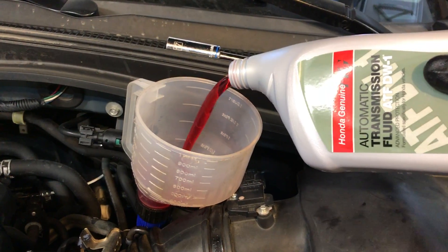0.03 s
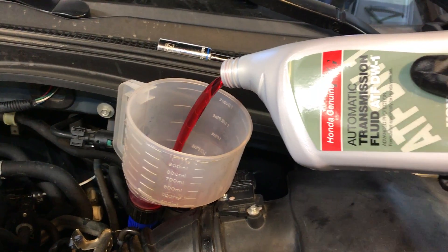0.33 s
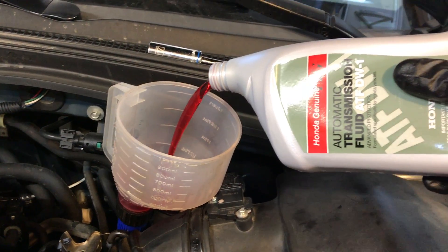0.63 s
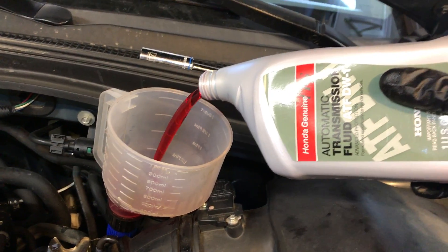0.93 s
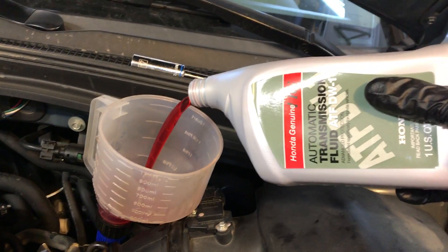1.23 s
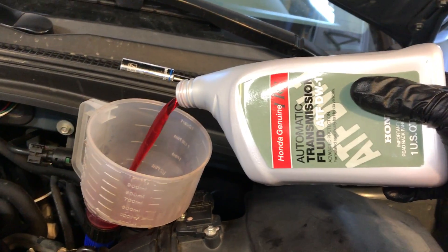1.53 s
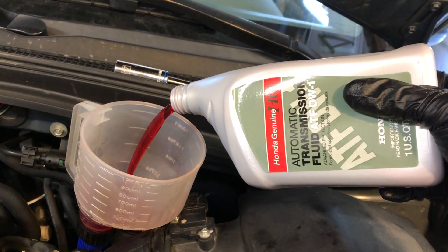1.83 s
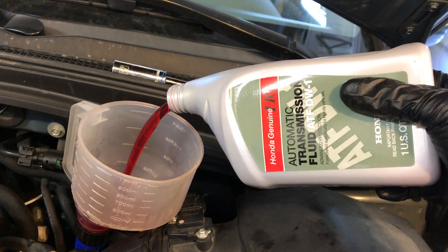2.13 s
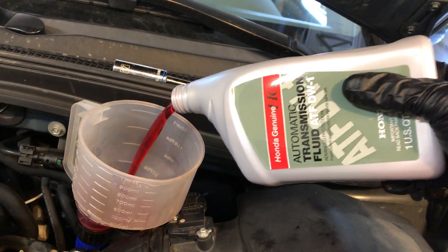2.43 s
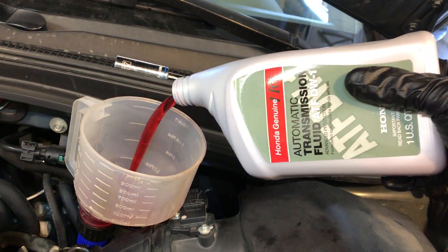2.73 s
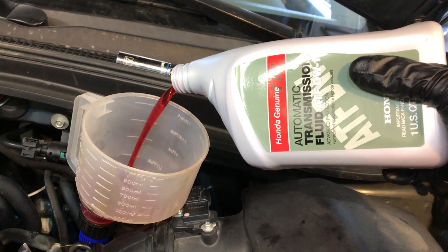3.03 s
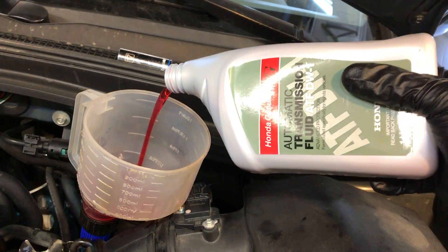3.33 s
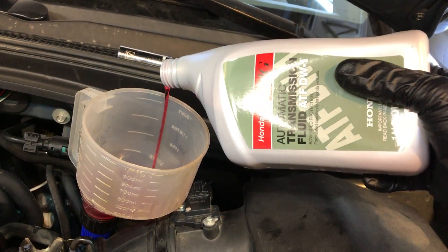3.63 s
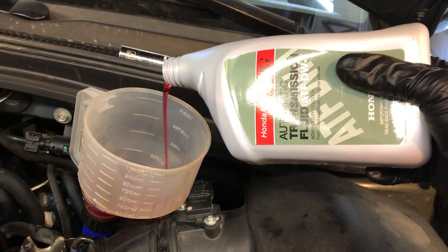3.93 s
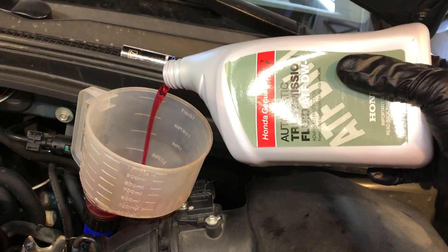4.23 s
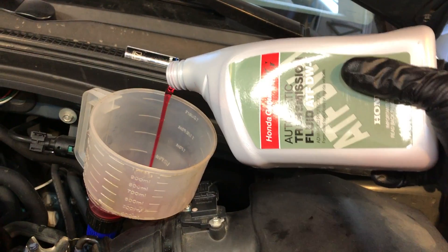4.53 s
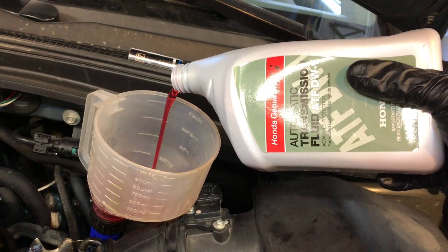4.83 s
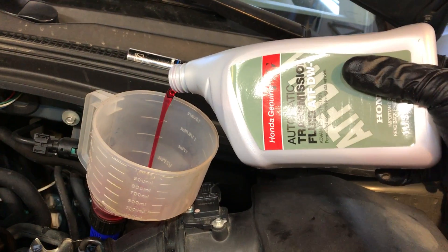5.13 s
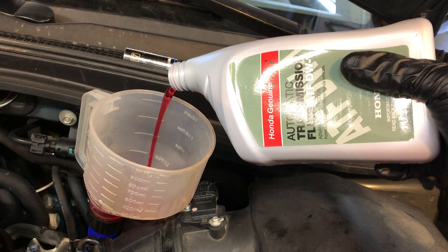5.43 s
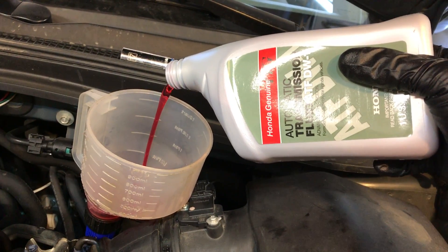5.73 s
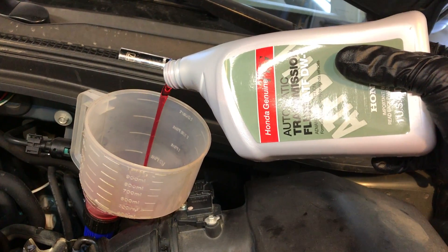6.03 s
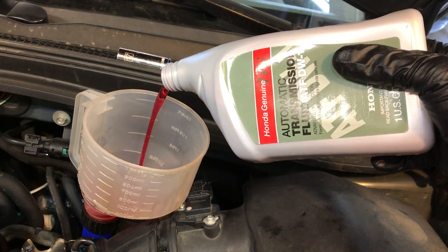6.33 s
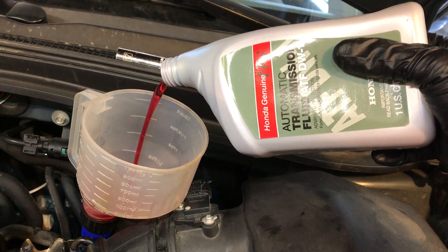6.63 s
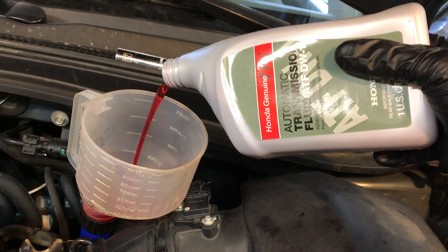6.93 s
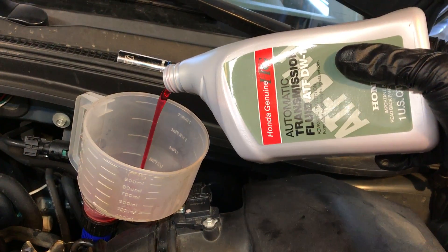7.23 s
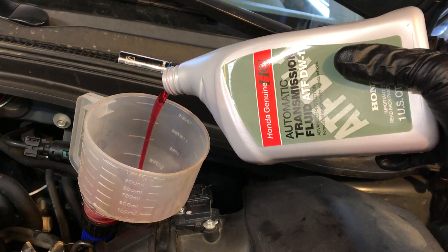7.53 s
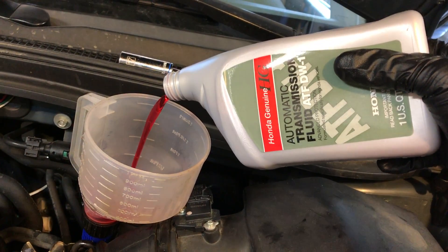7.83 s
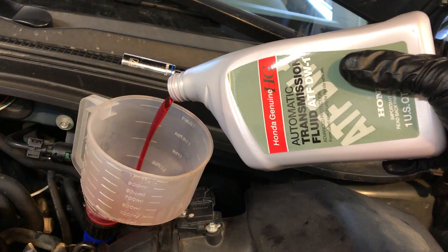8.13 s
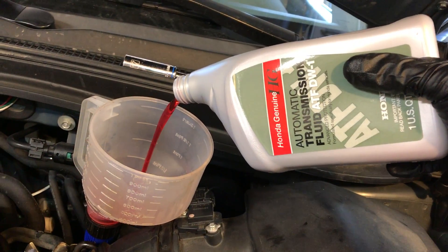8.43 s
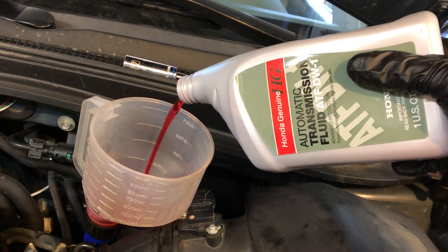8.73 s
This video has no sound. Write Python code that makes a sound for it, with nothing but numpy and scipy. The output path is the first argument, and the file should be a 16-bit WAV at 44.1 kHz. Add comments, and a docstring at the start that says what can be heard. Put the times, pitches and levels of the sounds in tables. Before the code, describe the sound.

Trapped air burps through oily fluid in a plastic funnel, with a glug and rapid bubble pops, after a quiet stretch of faint ticks.

```python
"""Trapped air burps up through a plastic funnel as transmission fluid drains into an engine.
The oily film flaps and snaps, ringing the air in the neck: a glug and a rough flutter first, then a
string of bubble pops that slows, doubles up and thins out. Hard pops throw a sparkle of spray.
The pour itself is silent. Before the burp, something scuffs once and the bottle ticks in the hand.
The quiet garage answers briefly, and traffic rumbles far away."""
import sys
import numpy as np
from scipy import signal
from scipy.fft import rfft, irfft, next_fast_len
from scipy.io import wavfile
from scipy.ndimage import map_coordinates

SR = 44100
rng = np.random.default_rng(int(sys.argv[2]) if len(sys.argv) > 2 else 0)


def store_pcm(level_fs):
    """Save levels as 16-bit WAV."""
    pcm = np.round(np.clip(level_fs, -1, 1) * 32767).astype(np.int16)
    wavfile.write(sys.argv[1], SR, np.atleast_2d(pcm).T)


N = 387638

# air gushing through the neck: (time [s], relative flow [dB])
AIR_FLOW = [(6.975, -35.5), (6.987, -29), (7.027, -33), (7.037, -26), (7.063, -36), (7.115, -30),
            (7.149, -37), (7.289, -48), (7.312, -60)]
# air modes of neck and fill tube: (pitch [Hz], width [Hz], gain in the gush [dB], gain in the pops [dB])
NECK_MODES = [(239, 89, -7, -8.5), (373, 71, -10, -23), (512, 53, -20, -46.5), (601.7, 39.5, 7.5, -7.5),
              (800, 180, -1.5, -37), (1001, 50.5, 3.5, 1), (1070, 49, -10, -25), (1153, 116, -4.5, -9),
              (1460, 161, -3, -1.5), (1595, 105, -0.5, -14), (1840, 87, -16, -19), (2150, 150, -5, -10.5),
              (2374, 110, -5.5, -11.5), (3140, 170, -7, -8)]
# softness of the oily film's snap: (frequency [Hz], gain [dB])
FILM_EQ = [(60, -30), (250, -4.5), (600, 1.5), (1600, 2), (2450, -7.5), (3000, -17.5), (4000, -33.5),
           (5400, -48), (7500, -33), (16000, -47)]
# each flap's low puff of air: (frequency [Hz], gain [dB])
PUFF_EQ = [(40, -8.5), (110, -1.5), (240, 7.5), (370, 2.5), (480, -2.5), (900, -77), (3000, -123)]
# big bubbles bursting in the open neck: (time [s], peak [dB])
BURSTS = [(6.806, -42), (6.9768, -21), (6.9893, -10), (7.0354, -12), (7.055, -17), (7.113, -33),
          (7.1275, -19.5), (7.2103, -20), (7.2298, -26.5), (7.2797, -31)]
# what a slack bubble rings: (pitch [Hz], width [Hz], gain [dB])
SLACK_MODES = [(615, 16, -18), (850, 27, -3.5), (1011, 25, 6.5)]
# bright crack of a tearing film: (frequency [Hz], gain [dB])
TEAR_EQ = [(300, -68), (1800, -8), (2700, 2.5), (3500, -7.5), (4100, -34), (8000, -36.5)]
# ring of the spout: (pitch [Hz], width [Hz], gain [dB])
SPOUT_MODES = [(4480, 130, -14.5), (5450, 170, -3.5)]
# sparkle of fine spray: (centre [Hz], width [Hz], gain [dB])
SPRAY_BANDS = [(9530, 600, -3.5), (12270, 1000, -1), (15500, 1300, -9)]
# plastic ticks and oil spatter: (time [s], peak [dB], ring pitch [Hz], ring over the snap [dB])
TICKS = [(0.47, -52.5, 4200, 9), (1.033, -44.5, 2980, 5), (1.184, -51, 4060, 6), (1.565, -54, 4670, 12),
         (2.0991, -54.5, 3030, 17), (2.6487, -49, 5040, 8), (2.702, -51.5, 4370, 5),
         (3.124, -53.5, 1130, 10), (3.135, -54.5, 1300, 6), (3.16, -53.5, 3960, 8), (6.9886, -45, 5640, 9),
         (7.014, -57, 6800, 12), (7.035, -50, 9050, 9), (7.054, -43, 2600, 16), (7.069, -48, 3000, 16),
         (7.202, -49, 9000, 6), (7.2302, -43, 5400, 9)]
# tone shared by all ticks: (frequency [Hz], gain [dB])
TICK_EQ = [(300, -1), (1200, -8), (3000, -4), (6500, -1.5), (10000, -8.5), (16000, -1)]
# dry hiss of the scuff: (frequency [Hz], gain [dB])
SCUFF_EQ = [(200, -18), (320, 7.5), (430, -22), (600, 1), (700, -15), (820, -6), (1100, -19), (1800, -18),
            (2800, -13.5), (4100, -8.5), (6000, -20.5), (8800, -8), (11000, -16), (16000, -20)]
# reverb tail of the garage: (frequency [Hz], time to fall 60 dB [s])
GARAGE_DECAY = [(200, 0.6), (1500, 0.31), (10000, 0.05)]
# far cars passing: (time when nearest [s], tyre level [dB], swell time [s])
CARS = [(3.3, -72.5, 0.66), (8.2, -60, 2.22)]
# tyre wash of the far road: (frequency [Hz], gain [dB])
TYRE_EQ = [(40, -13), (80, 6), (122, 20.5), (180, 10.5), (260, 7.5), (450, -4.5), (900, 2.5), (1500, -3.5),
           (2200, -15.5), (5000, -38), (16000, -66)]
# drone of a passing car: (frequency [Hz], gain [dB])
DRONE_EQ = [(45, -28), (85, 1.5), (125, 2), (160, -16.5), (240, -10), (300, -20.5), (380, -12), (500, -35),
            (2000, -82)]
# rumble of far engines: (frequency [Hz], gain [dB])
RUMBLE_EQ = [(20, -39), (35, -22.5), (46, -4), (55, 1.5), (64, -6.5), (78, 5.5), (90, -4.5), (120, -4.5),
             (150, -16.5), (210, -15), (300, -30), (600, -48), (2000, -101)]
# tones in that rumble: (pitch [Hz], level [dB])
HUM_TONES = [(55, -63.5), (73, -66.5), (122, -75.5)]
# room tone of still air: (frequency [Hz], gain [dB])
ROOM_TONE_EQ = [(100, 6.5), (300, 6), (600, -1.5), (1200, -8), (2500, -8.5), (4200, -9.5), (4900, -13),
                (6000, -10.5), (7700, -14.5), (8600, -11.5), (10500, -16.5), (11500, -13), (13000, -10.5),
                (17000, -13.5)]

GUSH_ATTACK_S, GUSH_RELEASE_S = 0.0019, 0.012  # the air breaks through; the oil closes over it again
FLAP_HZ, FLAP_OCTAVES_PER_DB = 141, 0.0115  # flap rate at full flow; it slows as the flow weakens
TURBULENCE_DB, CALMING_DB_PER_S = 2.5, 51  # ragged at first, settling into a regular flutter
PUFF_DB, PUFF_OPEN_S, PUFF_FOLLOWS = -42, 0.17, 0.3  # gain, time for the neck to open, dB per dB of flow
STRING_START_S, FIRST_GAP_S, GAP_GROWTH = 7.3267, 0.01897, 0.0986  # gap k = first gap * k ** growth
DOUBLED_S, BETWEEN_DB_PER_S = 7.77, 100  # when the in-between pops reach full size; how fast they grow
POP_DB, POP_FADE_DB_PER_S = -15, 28.5  # pop gain, fading as the trapped air runs out
POP_ATTACK_S, POP_RELEASE_S = 0.048, 0.075  # fade-in and fade-out of the whole string
THIN_HZ, THIN_HZ_PER_S = 200, 1080  # a rising low cut: shrinking bubbles lose their bass


def gush(gain_db=3, follows=0.85, jitter_s=0.00057, scatter_db=2.5, swirl=0.92, waver_octaves=0.0251):
    """Oil flaps in the escaping air, faster in strong flow; the flutter starts rough and grows regular."""
    times, levels = np.transpose(AIR_FLOW)
    t = np.arange(N) / SR
    flow_db = np.interp(t, times, levels)
    drop_db = flow_db - flow_db.max()
    flowing = (t >= times[0]) & (t < times[-1])
    age = np.maximum(t - times[0], 0)
    opening = np.clip(np.minimum(age / GUSH_ATTACK_S, (times[-1] - t) / GUSH_RELEASE_S), 0, 1)
    turbulence = amp(TURBULENCE_DB - CALMING_DB_PER_S * age)
    rate = FLAP_HZ * 2 ** (FLAP_OCTAVES_PER_DB * drop_db + waver_octaves * wobble(35))
    cycles = np.cumsum(rate * flowing) / SR
    at = np.flatnonzero(np.diff(np.ceil(cycles)) > 0)  # one flap as each cycle begins
    late, size = rng.standard_normal((len(at), 2)).T
    strength = opening[at] * amp(scatter_db * size) * np.sqrt(SR / rate[at])
    flaps = impulses(at + late * jitter_s * SR * turbulence[at], strength)
    # the air swirls most just after each flap
    eddies = opening * rng.standard_normal(N) * (1 + swirl * np.cos(2 * np.pi * cycles - 1))
    level = amp(gain_db + flow_db.max() + follows * drop_db)
    drive = level * (flaps + turbulence * eddies) / np.sqrt(1 + turbulence ** 2)
    flutter = through(drive, neck_ring([(hz, w, db) for hz, w, db, _ in NECK_MODES], soft_hz=2000))
    push = amp(PUFF_DB + PUFF_FOLLOWS * drop_db) * np.minimum(age / PUFF_OPEN_S, 1) ** 2
    puffs = through(flaps * push, impulse_response(lambda hz: amp(along(PUFF_EQ, hz))))
    return slackening_film(flutter, age) + puffs


def slackening_film(flutter, age, taut_hz=750, slack_hz=950, slacken_s=0.015, darken_db_per_s=25):
    """A taut film passes only the high modes; as it slackens, the low modes take over."""
    thin = butter(flutter, 3, taut_hz, "high")
    mellow = filtered(flutter, lambda hz: 1 / np.hypot(1, (hz / slack_hz) ** 4))
    brightness = 0.69 * amp(-darken_db_per_s * age)
    slack = brightness * flutter + (1 - brightness) * mellow
    taut = np.exp(-age / slacken_s)
    return taut * thin + (1 - taut) * slack


def glug(start_s=6.995, full_s=7.043, peak_db=-22, note_hz=598, sag_hz=70, sag_s=0.019, t60=0.12):
    """One big bubble swells in the neck: its ring sinks onto the neck's note, then dies."""
    age = np.maximum(np.arange(N) / SR - start_s, 0)
    swell = np.minimum(age / (full_s - start_s), 1) ** 2
    decay = amp(-60 * np.maximum(age + start_s - full_s, 0) / t60)
    pitch = note_hz + sag_hz * np.exp(-age / sag_s)
    return amp(peak_db) * swell * decay * np.sin(2 * np.pi * np.cumsum(pitch) / SR)


def bursts(low_cut_hz=950):
    """Single large bubbles crack in the wide open neck, with little bass."""
    times, peak_db = np.transpose(BURSTS)
    ring = neck_ring([(hz, w, db) for hz, w, db, _ in NECK_MODES], soft_hz=2300)
    crack = peak_one(butter(ring, 1, low_cut_hz, "high"))
    return through(impulses(times * SR, amp(peak_db)), crack)


def bubble_string(scatter_db=1.44, mellow_db=-5, snap_db=-19, detune=0.014, jitter_s=0.0003):
    """The last air leaves bubble by bubble; smaller ones slip in between until the rate has doubled."""
    main = pop_times()
    grown = lambda s: amp(BETWEEN_DB_PER_S * min(s - DOUBLED_S, 0))
    pops = [(s, 1) for s in main] + [(s, grown(s)) for s in (main[:-1] + main[1:]) / 2]
    bright = peak_one(neck_ring([(hz, w, db) for hz, w, _, db in NECK_MODES]))
    mellow = amp(mellow_db) * peak_one(neck_ring(SLACK_MODES))
    snap = amp(snap_db) * peak_one(impulse_response(lambda hz: amp(along(TEAR_EQ, hz))))
    out, n = np.zeros(N + SR), np.arange(len(bright))
    for s, size in pops:
        louder, higher, late = rng.standard_normal(3)
        age = s - main[0]
        fade_in = (age + FIRST_GAP_S / 2) / POP_ATTACK_S
        fade_out = (main[-1] - s + FIRST_GAP_S) / POP_RELEASE_S
        level = amp(POP_DB - POP_FADE_DB_PER_S * age + scatter_db * louder)
        slack = np.interp(grown(s), [0, 1], [0.089, 0.45])  # more mellow ring as the pops double up
        pop = (1 - slack) * bright + slack * mellow + snap
        pop = np.interp(n * (1 + detune * higher), n, pop)  # repitch each pop a touch
        pop = butter(pop, 2, THIN_HZ + THIN_HZ_PER_S * age, "high")
        out[round((s + jitter_s * late) * SR):][:len(pop)] += size * min(fade_in, 1, fade_out) * level * pop
    return out[:N]


def pop_times(count=24, quicken_per_s=1.3):
    """The main pops come ever more slowly, then hurry a little as the air runs out."""
    gaps = FIRST_GAP_S * np.arange(1, count + 1) ** GAP_GROWTH
    past_doubling = np.maximum(STRING_START_S + np.cumsum(gaps) - DOUBLED_S - FIRST_GAP_S, 0)
    gaps /= 1 + quicken_per_s * past_doubling
    return STRING_START_S + np.append(0, np.cumsum(gaps))


def neck_ring(modes, soft_hz=np.inf, notch_hz=1295, notch_width_hz=110, notch_depth=0.93):
    """One film snap rings the air modes; a side cavity swallows one band, and a soft snap loses treble."""
    def gain(hz):
        air = sum(amp(db) * resonance(hz, centre, width) for centre, width, db in modes)
        cavity = 1 - notch_depth * resonance(hz, notch_hz, notch_width_hz)
        softness = np.hypot(1, 2 * np.clip(hz / soft_hz - 1, 0, 1))
        return abs(air * cavity) * amp(along(FILM_EQ, hz)) / softness
    return impulse_response(gain)


def spout_hiss(burp, ring_db=-47, spray_db=-22):
    """Every pop rings the spout; only the hard ones throw a wet sparkle of spray."""
    ringing = spit(burp, SPOUT_MODES, sharp_hz=1390, smooth_hz=300, exponent=0.57)
    spray = spit(burp, SPRAY_BANDS, sharp_hz=2230, smooth_hz=900, exponent=1.056)
    return amp(ring_db) * ringing + amp(spray_db) * spray


def spit(burp, modes, sharp_hz, smooth_hz, exponent):
    """Noise rides the sharp edge of each snap and rings a few high modes."""
    snaps = butter(burp, 4, sharp_hz, "high")
    envelope = abs(butter(abs(snaps), 2, smooth_hz, "low"))
    colour = lambda hz: sum(amp(db) * abs(resonance(hz, centre, w)) ** 1.5 for centre, w, db in modes)
    return through(envelope ** exponent * rng.standard_normal(N), impulse_response(colour))


def ticks(t60=0.025, ring_width_hz=500, snap=1.5):
    """The bottle ticks and oil spatters: each a snap and a short rattle with a resonance of its own."""
    out, t = np.zeros(N + SR), np.arange(SR // 10) / SR
    for s, peak_db, ring_hz, ring_db in TICKS:
        def colour(hz):
            ring = abs(1 + amp(ring_db) * resonance(hz, ring_hz, ring_width_hz))
            return amp(along(TICK_EQ, hz)) * ring / np.hypot(1, hz / (2.4 * ring_hz))
        rattle = rng.standard_normal(len(t)) * amp(-60 * t / t60)
        rattle[0] += snap
        tick = signal.fftconvolve(rattle, impulse_response(colour))
        out[round(s * SR):][:len(tick)] += amp(peak_db) * peak_one(tick)
    return out[:N]


def scuff(start_s=0.12, level_db=-55, attack_s=0.0046, hold_s=0.016, t60=0.35):
    """A short dry hiss that holds for a moment and fades."""
    age = np.maximum(np.arange(N) / SR - start_s, 0)
    attack = 1 - np.exp(-age / attack_s)
    return noise(SCUFF_EQ) * attack * amp(level_db - 60 * np.maximum(age - hold_s, 0) / t60)


def garage(x, predelay_s=0.0063):
    """The raised bonnet and the walls answer with a short, dark tail."""
    hz, t, spectra = signal.stft(rng.standard_normal(SR // 2), SR, nperseg=256)
    decay = amp(-60 * t / along(GARAGE_DECAY, hz)[:, None])
    tail = signal.istft(spectra * decay, SR, nperseg=256)[1]
    return through(x, np.pad(tail / np.linalg.norm(tail), (round(predelay_s * SR), 0)))


def traffic(rumble_db=-59, road_db=-72.5, drone_gain_db=-1):
    """A bed of far engines and tyres; passing cars swell and fade over it."""
    t = np.arange(N) / SR
    passing = sum(amp(db) * np.exp(-((t - s) / swell) ** 2) for s, db, swell in CARS)
    tyres = np.hypot(amp(road_db), passing) * noise(TYRE_EQ)
    drone = amp(drone_gain_db) * passing * noise(DRONE_EQ)
    return tyres + drone + amp(rumble_db) * noise(RUMBLE_EQ)


def hum(waver_db=3, drift_hz=2.623):
    """Low tones swell and wander in the far rumble."""
    out = np.zeros(N)
    for hz, db in HUM_TONES:
        level = np.sqrt(2) * amp(db + waver_db * wobble(5))
        pitch = hz + drift_hz * wobble(5)
        out += level * np.sin(2 * np.pi * np.cumsum(pitch) / SR)
    return out


def room_tone(level_db=-69.5):
    """The faint, steady hiss of still air."""
    return amp(level_db) * noise(ROOM_TONE_EQ)


def amp(db):
    return 10 ** (np.asarray(db) / 20)


def peak_one(x):
    return x / abs(x).max()


def along(points, hz):
    """Read a curve of (frequency [Hz], value) points on a log axis."""
    freqs, values = np.transpose(points)
    return np.interp(np.log(hz + 1), np.log(freqs + 1), values)


def wobble(knots_per_s):
    """A smooth random curve."""
    knots = rng.standard_normal(int(N * knots_per_s / SR) + 4)
    return map_coordinates(knots, [np.arange(N) * knots_per_s / SR])


def impulses(at, sizes):
    return np.bincount(at.astype(int), sizes, N)[:N]


def noise(eq):
    """Coloured noise of rms 1."""
    x = filtered(rng.standard_normal(N), lambda hz: amp(along(eq, hz)))
    return x / np.sqrt(np.mean(x ** 2))


def butter(x, order, hz, kind):
    return signal.lfilter(*signal.butter(order, hz, kind, fs=SR), x)


def filtered(x, gain):
    """Zero-phase EQ by the curve gain(hz)."""
    size = next_fast_len(N + SR // 2)
    return irfft(rfft(x, size) * gain(np.fft.rfftfreq(size, 1 / SR)), size)[:N]


def resonance(hz, centre, width):
    return 1j * hz * width / (centre ** 2 - hz ** 2 + 1j * hz * width)


def impulse_response(gain, size=8192):
    """A minimum-phase hit of energy 1, coloured by gain(hz): it starts at once."""
    cepstrum = irfft(np.log(np.maximum(gain(np.fft.rfftfreq(size, 1 / SR)), 1e-6)))
    cepstrum[1:size // 2] *= 2
    cepstrum[size // 2 + 1:] = 0
    response = irfft(np.exp(rfft(cepstrum)))
    return response / np.linalg.norm(response)


def through(x, response):
    return signal.fftconvolve(x, response)[:N]


def scene(reverb_db=-17):
    """Burp and handling up close with a touch of garage, over the quiet background, in mono."""
    burp = gush() + glug() + bursts() + bubble_string()
    near = burp + spout_hiss(burp) + ticks() + scuff()
    return (near + amp(reverb_db) * garage(near) + traffic() + room_tone() + hum())[None]


def record(dry, top_hz=17200):
    """A brick-wall high cut on the whole mix."""
    return filtered(dry[0], lambda hz: hz < top_hz)[None]


dry = scene()
out = record(dry)
store_pcm(out)
```